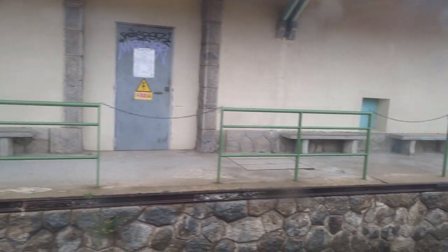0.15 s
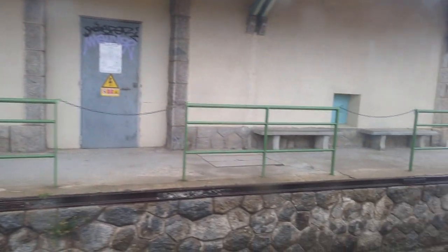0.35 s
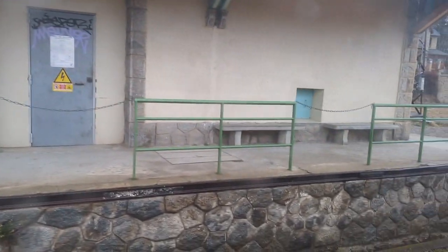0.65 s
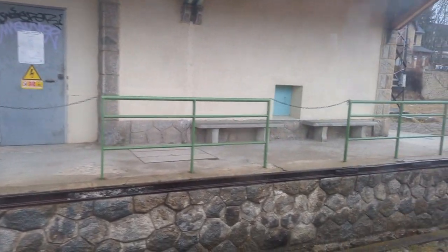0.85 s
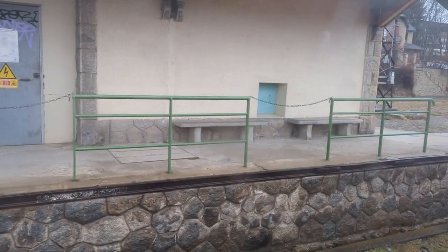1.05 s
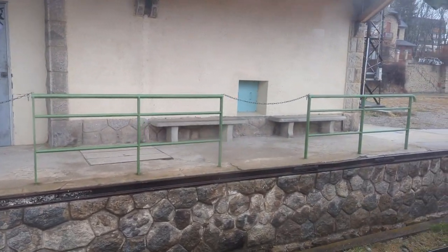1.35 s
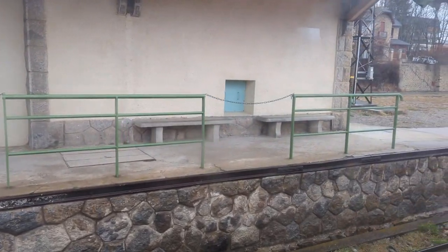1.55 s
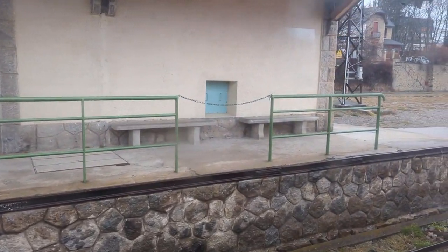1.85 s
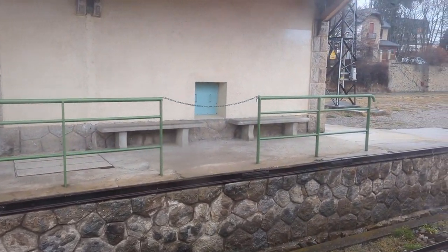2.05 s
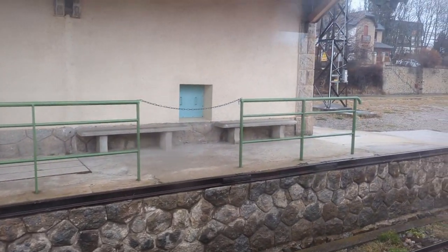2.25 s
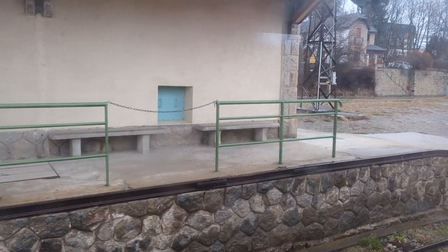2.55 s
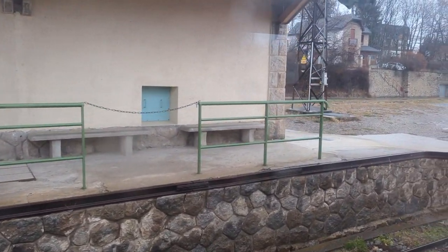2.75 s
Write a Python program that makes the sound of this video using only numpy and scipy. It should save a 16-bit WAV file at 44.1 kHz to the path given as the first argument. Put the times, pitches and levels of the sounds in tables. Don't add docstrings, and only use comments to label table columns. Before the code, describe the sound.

Inside an electric rail car rolling slower, deep wheel rumble, jolting rattles, then a faint air hiss

```python
import sys
import numpy as np
from scipy import signal
from scipy.fft import rfft, irfft, next_fast_len
from scipy.io import wavfile
from scipy.ndimage import uniform_filter1d, map_coordinates

SR = 44100
rng = np.random.default_rng(int(sys.argv[2]) if len(sys.argv) > 2 else 0)


def materialize(psi):
    bounded = np.clip(np.atleast_2d(psi).T, -1, 1)
    quanta = np.round(bounded * 32767).astype(np.int16)
    wavfile.write(sys.argv[1], SR, quanta)


def how_loud(loudness_db):
    steps = np.asarray(loudness_db, float) / 20
    return 10 ** steps


N = 127890

# time in seconds, level in dB.
ROLLING_EFFORT = [
    (0, -53.5),
    (.2, -51),
    (.45, -56.5),
    (1.3, -56.5),
    (1.9, -56.5),
    (2.3, -60),
    (2.9, -59),
]
# start in seconds, peak in dB, frame part in dB, bright sash part in dB.
FITTING_JOLTS = [(0.0014, -48, 4.5, -21), (0.0246, -49, -3, -42), (0.0732, -45, 4, -2),
                 (0.084, -39.5, 2, -28), (0.1396, -45, -10, -3), (0.196, -44, -3, -6.5),
                 (0.2885, -53, -9, -3.5), (0.322, -47.5, -28, -11), (0.343, -58, -12, -20.5),
                 (0.403, -52, 4, -19), (0.5434, -48, -9, -4), (0.5917, -50.5, 0, -13.5),
                 (0.6524, -52.5, -2, -10), (0.711, -54, -1.5, -19.5), (0.7434, -61.5, -9, -24),
                 (0.945, -63.5, -1, -22), (1.0918, -49.5, -26, -1), (1.152, -63.5, -7, -21),
                 (1.2824, -70, 12, -35), (1.3514, -60, -4.5, -21), (1.549, -64, -5.5, -24.5),
                 (1.7534, -58.5, -12, -30), (1.7784, -54, -9, -18.5), (1.86, -70, -2, -24),
                 (1.9517, -62, 3, -16.5), (2.153, -64.5, 7, -19), (2.355, -66.5, 4, -37.5),
                 (2.402, -64.5, -1, -23), (2.5681, -66.5, 10, -12), (2.76, -60.5, -10, -36)]


def unit(x):
    return x / np.sqrt(np.mean(x ** 2) + 1e-20)


def along(points, hz):
    f, v = np.transpose(points)
    return np.interp(np.log(hz + 1), np.log(f + 1), v)


def curves(rows):
    s, *columns = np.transpose(rows)
    return [np.interp(np.arange(N) / SR, s, column) for column in columns]


def wobble(rate):
    return map_coordinates(rng.standard_normal(800), [np.arange(N) * min(rate, 250) / SR])


def filtered(x, response):
    m = next_fast_len(N + SR // 2)
    return irfft(rfft(x, m) * response(np.fft.rfftfreq(m, 1 / SR)), m)[..., :N]


def modes(table, f):
    total = 0
    for k, (centre, width, db) in enumerate(table):
        damping = 1j * f * width
        total = total + (-1) ** k * how_loud(db) * damping / (centre * centre - f * f + damping)
    return total


def shut(points):
    return lambda hz: how_loud(along(points, hz)) * (hz > 15)


def tone(hz, wander_hz, rate):
    return np.sqrt(2) * np.sin(2 * np.pi * np.cumsum(hz + wander_hz * wobble(rate)) / SR)


def spread(pair, gain):
    # frequency in Hz, left-right likeness from -1 to 1.
    likeness = [(60, .985), (250, .972), (640, .55), (1300, -.3), (3000, -.05), (5000, .3), (8000, .75),
                (15000, .6)]
    turn = lambda hz: np.arccos(np.clip(along(likeness, hz), -1, 1)) / 2
    mid, side = filtered(pair, lambda hz: gain(hz) * [np.cos(turn(hz)), np.sin(turn(hz))])
    return np.array([mid + side, mid - side])


def patchy(x, patchy_db, size):
    z = signal.stft(np.pad(x, ((0, 0), (0, 512))), nperseg=512)[2]
    field = uniform_filter1d(rng.standard_normal(z.shape[1:]), size=5, axis=0)
    field = uniform_filter1d(field, size=size, axis=1)
    return signal.istft(z * how_loud(patchy_db * unit(field)), nperseg=512)[1][:, :N]


def rush(gain, patchy_db):
    return unit(spread(patchy(rng.standard_normal((2, N)), patchy_db, size=10), gain))


def bursts(s, db, rise_s, hold_s, t60_s):
    u = np.maximum(np.arange(N) / SR - np.reshape(s, (-1, 1)), 0)
    shape = (1 - np.exp(-u / rise_s)) * how_loud(-60 * np.maximum(u - hold_s, 0) / t60_s)
    return np.sqrt(how_loud(2 * np.asarray(db)) @ shape ** 2)


def struck(table, gain_db, rise_s, t60_s, lag_s):
    out = np.zeros((2, N + SR))
    t = np.arange(SR // 4) / SR
    port_t = t - lag_s * np.array([[0], [1]])
    for s, db, hz in table:
        shape = how_loud(db + gain_db - 60 * t / t60_s(hz)) * (1 - np.exp(-t / rise_s))
        out[:, round(s * SR):][:, :len(t)] += shape * np.sin(2 * np.pi * hz * port_t)
    return out[:, :N]


def joints():
    lift, rise_s, fade_s = 0.65, 0.0041, 0.029
    t = np.arange(0, N, 64) / SR
    u = np.maximum(t - np.transpose(FITTING_JOLTS)[0][:, None], 0)
    swell = np.max((1 - np.exp(-u / rise_s)) * np.exp(-u / fade_s), axis=0)
    return np.interp(np.arange(N) / SR, t, 1 + lift * swell)


def rolling():
    # frequency in Hz, level in dB per Hz.
    floor_colour = [(20, -6.5), (45, 9), (70, 2.5), (100, 4), (160, -2.5), (290, -5), (330, -10),
                    (700, -120)]
    # frequency in Hz, level in dB per Hz.
    wheel_colour = [(250, -11.5), (420, -7), (1300, -18.5), (2400, -26), (4200, -35.5), (5400, -47.5),
                    (7600, -57.5), (15000, -55.5)]
    # frequency in Hz, width in Hz, level in dB.
    body_modes = [(570, 76, -5.5), (986, 18, 6), (1966, 150, -1.5), (4330, 31, -2.5), (6560, 500, 14.5)]
    rumble_db, rumble_grows, wheels_db = 17.5, 1, 2.5
    treble_grows, treble_hz = 1, 1810
    roll_db, = curves(ROLLING_EFFORT)
    mean_db = roll_db.mean()
    change_db = roll_db - mean_db

    rumble_level = how_loud(mean_db + rumble_db + rumble_grows * change_db + 1.5 * wobble(6.12))
    rumble = rumble_level * rush(shut(floor_colour), patchy_db=0.5)

    colour = lambda hz: shut(wheel_colour)(hz) * (1 + np.abs(modes(body_modes, hz)) * 0.56)
    wheel_level = how_loud(roll_db + wheels_db + 0.51 * wobble(6.23) + 1.27 * wobble(17))
    wheels = joints() * wheel_level * rush(colour, patchy_db=1.07)
    treble = filtered(wheels, lambda hz: 1 / (1 + (treble_hz / (hz + 1)) ** 4))
    return rumble + wheels + treble * (how_loud(treble_grows * change_db) - 1)


def boom():
    # time of the peak in seconds, peak in dB, pitch in Hz, length in seconds.
    air_jolts = [(0.025, -26.5, 69.9, 0.02), (0.116, -19.5, 64.9, 0.023), (0.216, -27, 73.27, 0.013),
                 (0.284, -23.5, 73.77, 0.015), (0.33, -26.2, 74.93, 0.02), (0.386, -21.5, 70.8, 0.021),
                 (0.427, -26, 70.4, 0.058), (0.472, -22.5, 70.65, 0.041), (0.551, -23, 75.36, 0.013),
                 (0.621, -31.2, 70.3, 0.04), (0.672, -29.5, 64.6, 0.04), (0.738, -28.5, 66.94, 0.0216),
                 (0.798, -28.5, 66.6, 0.034), (0.838, -26.5, 68.15, 0.031), (0.952, -26.3, 68.18, 0.032),
                 (1.112, -27.0, 70.52, 0.015), (1.165, -32.5, 71.4, 0.015), (1.263, -25, 67.16, 0.024),
                 (1.34, -30, 69.34, 0.0069), (1.386, -35.5, 78.2, 0.0099), (1.492, -29.5, 61.7, 0.018),
                 (1.537, -30, 67.94, 0.011), (1.652, -31.7, 75.65, 0.02), (1.756, -28, 67.73, 0.011),
                 (1.811, -19.5, 63.6, 0.0092), (1.845, -25, 66.3, 0.0083), (1.916, -26, 65.9, 0.011),
                 (1.956, -28, 69, 0.014), (2.027, -32, 61.75, 0.034), (2.165, -30, 70.83, 0.012),
                 (2.28, -33, 67.2, 0.017), (2.364, -32.5, 64.5, 0.01), (2.422, -36, 60.6, 0.014),
                 (2.468, -32.5, 70.6, 0.012), (2.535, -30, 66.05, 0.021), (2.663, -31.5, 72.4, 0.022),
                 (2.714, -39, 67.5, 0.021), (2.751, -44, 73.8, 0.022), (2.782, -30, 61.7, 0.016),
                 (2.842, -38, 67, 0.018)]
    swell, fade, boom_db = 0.84, 1.03, -4
    t = np.arange(N) / SR
    s, db, hz, length_s = np.transpose(air_jolts)
    u = t[::64] - s[:, None]
    shape = np.exp(-(u / np.where(u < 0, swell, fade) / length_s[:, None]) ** 2)
    level = np.interp(t, t[::64], np.sqrt(how_loud(2 * (db + boom_db)) @ shape))
    return level * how_loud(0.35 * wobble(26)) * tone(np.interp(t, s, hz), 2.53, 15)


def floor_hum():
    # time in seconds, level in dB.
    hum_level = [(0, -43.5), (.1, -43), (.5, -53), (.6, -41.5), (.8, -48), (1.15, -62.5), (1.25, -40.5),
                 (1.48, -35), (1.6, -37.5), (1.68, -53.5), (1.9, -71), (1.97, -44.5), (2.1, -72.5),
                 (2.24, -40.5), (2.32, -72), (2.9, -51.5)]
    hum_db, = curves(hum_level)
    return how_loud(hum_db - 2.0 + 2.36 * wobble(43.09)) * tone(244.8, 2.32, 16)


def singing():
    # time in seconds, level in dB.
    sing_level = [(0, -60), (.1, -58), (.4, -59.5), (.78, -96), (.83, -61.5), (1.05, -60), (1.2, -64),
                  (1.26, -55.5), (1.4, -64.5), (1.6, -58), (1.7, -75), (2.6, -81), (2.75, -58), (2.9, -67)]
    mode_hz, width_hz = 1508, 86
    sing_db, = curves(sing_level)
    return how_loud(sing_db) * rush(lambda f: modes([(mode_hz, width_hz, 0)], f) ** 2, patchy_db=.5)


def rail_tone():
    return how_loud(curves(ROLLING_EFFORT)[0] - 33 + 1.8 * wobble(10)) * tone(4260, 20, 60)


def chatter():
    # frequency in Hz, width in Hz, level in dB.
    glass = [(3790, 110, -5.5), (4420, 36, -3), (5864, 29, -15), (6730, 130, -6), (7800, 110, -34),
             (8250, 200, -5)]
    # frequency in Hz, width in Hz, level in dB.
    sash = [(10500, 380, 11), (12200, 400, 10), (13300, 170, 12)]
    # frequency in Hz, width in Hz, level in dB.
    frame = [(1020, 580, -7), (1760, 150, 7), (1896, 100, 3.5), (2360, 190, 2)]
    hold_s, t60_s, contacts_per_s, chatter_db = 0.0035, 0.13, 1300, -5
    hard_db = -13.5
    s, db, frame_db, bright_db = np.transpose(FITTING_JOLTS)
    rise_s = 0.0017 / np.sqrt(np.clip(how_loud(bright_db - hard_db), .1, 1))[:, None]
    shake = patchy(rng.standard_normal((2, N)), 1.5, size=6)
    all_hz = np.linspace(1, SR / 2, num=4000)
    out = np.zeros((2, N))
    parts = ((glass, 0 * db, .2), (sash, bright_db - 2.5, 1.2), (frame, frame_db + 2.0, .4))
    for table, part_db, wide in parts:
        hits = shake * (0.65 + 1.3 * (rng.random(N) < contacts_per_s / SR))
        low, top = table[0][0], table[-1][0]
        limits = [(np.sqrt(low * top), 1.29 * (top - low), 0)]
        band = lambda f: (modes(table, f) + wide) * modes(limits, f) ** 2
        level = bursts(s, db + part_db + chatter_db, rise_s, hold_s, t60_s)
        band_rms = np.sqrt(np.mean(np.abs(band(all_hz)) ** 2))
        out = out + spread(level * hits, band) / band_rms
    return out


def knocks():
    # start in seconds, peak in dB.
    blows = [
        (0.086, -30),
        (0.323, -41),
        (0.544, -38),
        (1.693, -48),
        (2.548, -54),
        (2.754, -43),
    ]
    s, db = np.transpose(blows)
    level = bursts(s, db - 9, 0.0027, 0.0011, .16)
    return level * rush(lambda f: modes([(533, 620, 0)], f) ** 2, patchy_db=4.0)


def rings():
    # start in seconds, peak in dB, pitch in Hz.
    ringing_modes = [(0.086, -55, 1830), (0.095, -48, 2170), (0.2, -52.0, 1696), (0.291, -55, 2468),
                     (0.404, -50.9, 1772), (0.414, -59, 3730), (0.544, -69, 3914), (0.55, -64.8, 5981),
                     (0.553, -63, 6940), (0.55, -65.0, 1720), (0.594, -66, 1717), (0.594, -67, 5771),
                     (0.601, -71, 6700), (0.653, -58.5, 1674), (0.653, -75, 4430), (0.653, -67, 5677),
                     (0.661, -67, 6608), (0.711, -63, 2050), (0.711, -69.5, 4444), (0.711, -72.1, 5679),
                     (0.72, -67, 6500), (0.743, -69, 3959), (0.775, -73.1, 4457), (0.95, -70, 3940),
                     (1.093, -61, 6400), (1.094, -72, 4400), (1.153, -69, 3980), (1.353, -68.5, 3970),
                     (1.37, -78, 5617), (1.777, -66.8, 4420), (1.777, -75, 6640), (1.96, -74, 3933),
                     (2.153, -65, 3900), (2.36, -69, 3760), (2.405, -77, 6000)]
    rough = 1 + .8 * (wobble(250) + .5 * np.array([wobble(200), wobble(200)]))
    t60_s = lambda hz: .1 * np.sqrt(hz / 4000)
    return rough * struck(ringing_modes, 3, .003, t60_s, lag_s=.00004)


def thuds():
    # start in seconds, peak in dB, pitch in Hz.
    panel_blows = [
        (2.535, -41, 256),
        (2.72, -41.5, 290),
        (2.85, -45, 290),
        (0.544, -31.5, 110),
        (1.163, -47.5, 92),
        (0.165, -28, 105.4),
    ]
    return struck(panel_blows, 4, 0.01, lambda hz: 0.22, lag_s=0)


def catch_ticks():
    # start in seconds, peak in dB, centre in Hz.
    clicks = [
        (0.321, -44, 8000),
        (0.544, -50, 9000),
        (1.0935, -44.5, 6800),
        (1.452, -60, 7740),
        (1.613, -61, 5980),
    ]
    out = 0
    for s, db, hz in clicks:
        snap = bursts([s], [db], 0.00034, 0.00084, 0.017) * rng.standard_normal(N)
        out = out + filtered(snap, lambda f: modes([(hz, 0.78 * hz, 0)], f) ** 2)
    return out


def cabin(x):
    t60_s = 0.066
    t = np.arange(SR // 3) / SR
    tail = rng.standard_normal((2, len(t))) * how_loud(-60 * t / t60_s)
    wet = signal.fftconvolve(x, tail / np.linalg.norm(tail[0]), axes=1)[:, :N]
    return filtered(wet, lambda hz: 1 / (1 + 1j * hz / 5000))


def shoe_squeak():
    start_s, length_s, start_hz, rise_hz_per_s = 1.575, .09, 10700, 6500
    v = np.arange(N) / SR - start_s
    shape = np.sin(np.pi * np.clip(v / length_s, 0, 1))
    return how_loud(-99) * shape * tone(start_hz + rise_hz_per_s * np.clip(v, 0, 1), 40, 77)


def brake_air():
    # frequency in Hz, level in dB per Hz.
    air_colour = [(1000, -11), (1400, -4), (2400, -18.5), (2750, -13), (4300, -17), (4800, -23.5),
                  (7500, -36.5), (15000, -42)]
    # pitch in Hz, level over the air in dB.
    valve_edges = [(2660, -19), (4250, -23.5)]
    start_s, rise_s, air_db, swell_db_per_s, left_db = 2.545, 0.011, -61, 5.5, 2
    u = np.maximum(np.arange(N) / SR - start_s, 0)
    level = (1 - np.exp(-u / rise_s)) * how_loud(air_db + swell_db_per_s * u)
    whistle = sum(how_loud(db) * tone(hz, 12.1, 60) for hz, db in valve_edges)
    air = level * (rush(shut(air_colour), patchy_db=1.0) + whistle)
    return air * how_loud([[left_db], [-left_db]])


def scene():
    track = rolling() + boom() + floor_hum() + singing() + rail_tone()
    near = chatter() + knocks() + catch_ticks()
    panels = rings() + thuds()
    return track + near + how_loud(-12.5) * cabin(near) + panels + shoe_squeak() + brake_air()


def roll_off(x):
    return signal.sosfilt(signal.butter(12, 16530, fs=SR, output="sos"), x)


def record(dry):
    # frequency in Hz, left over right in dB.
    port_lean = [(200, 0.5), (700, 2), (1400, 0), (3000, 5), (5500, 0), (12000, 1)]
    low_cut_hz, top_hz = 38, 15780

    def ports(hz):
        lean = how_loud(along(port_lean, hz) * np.array([[.5], [-.5]]))
        return lean * (hz < top_hz) / (1 + (low_cut_hz / (hz + 1)) ** 4)

    return roll_off(filtered(dry, ports))


dry = scene()
out = record(dry)
materialize(out)
```